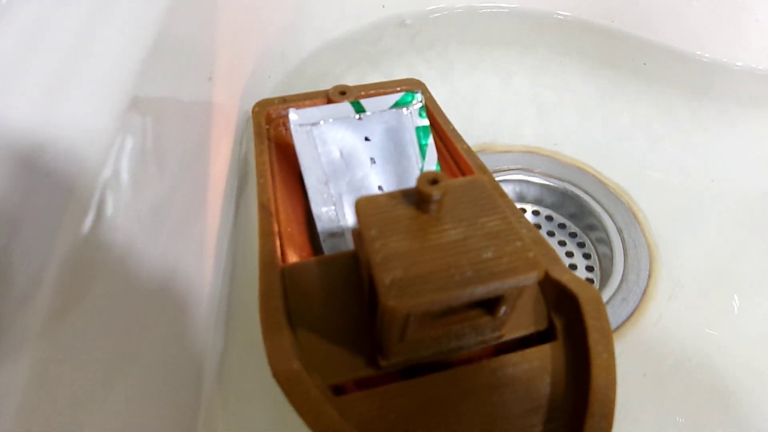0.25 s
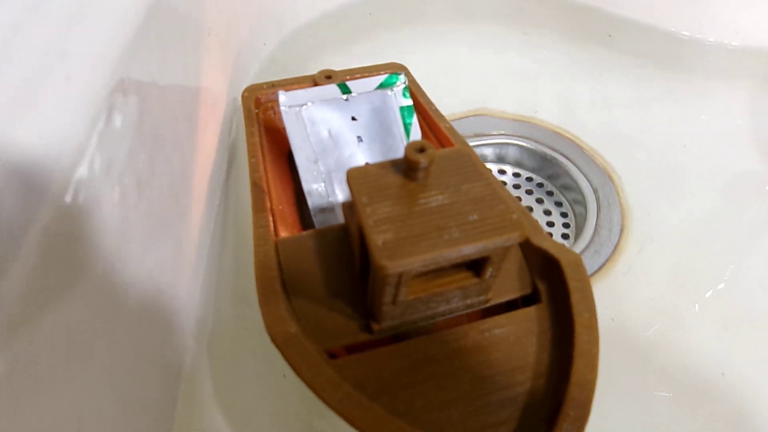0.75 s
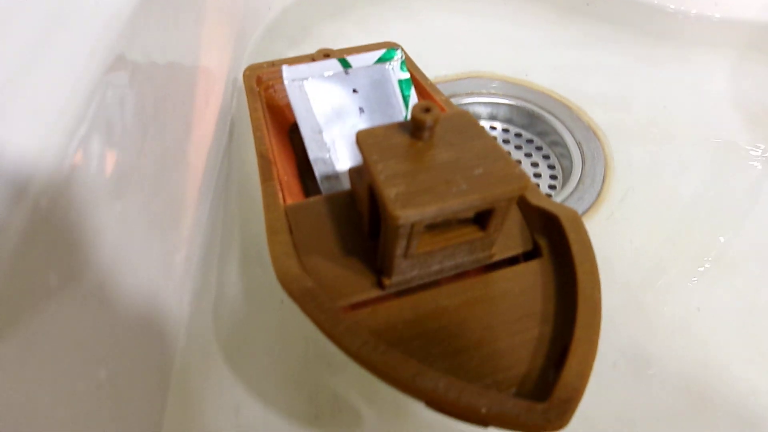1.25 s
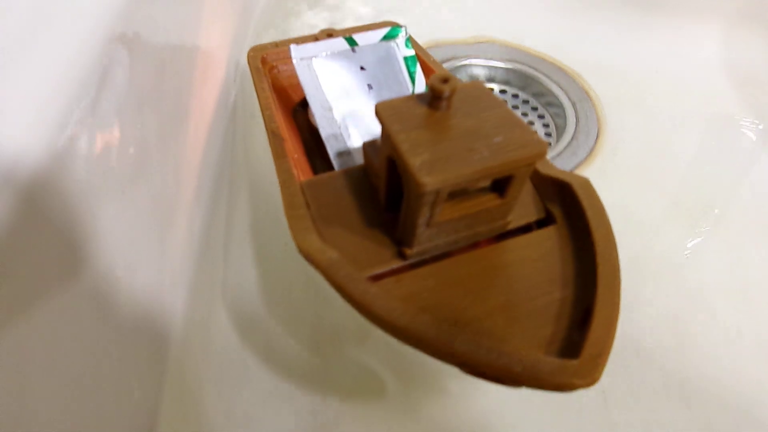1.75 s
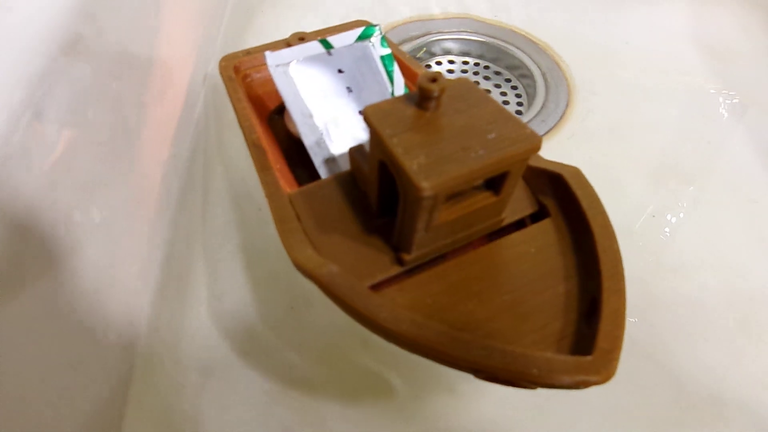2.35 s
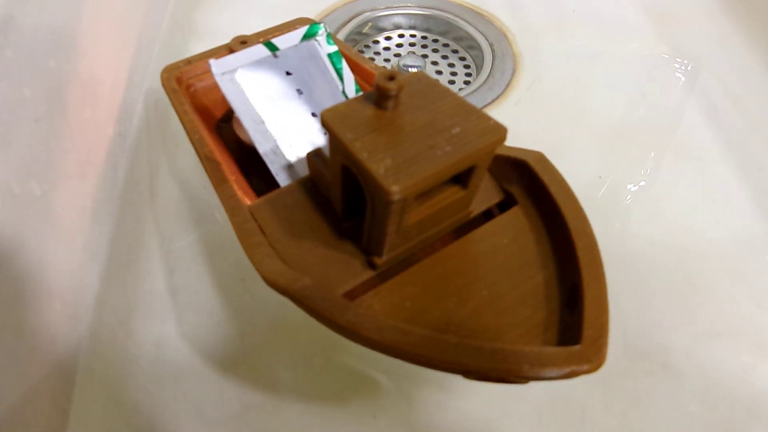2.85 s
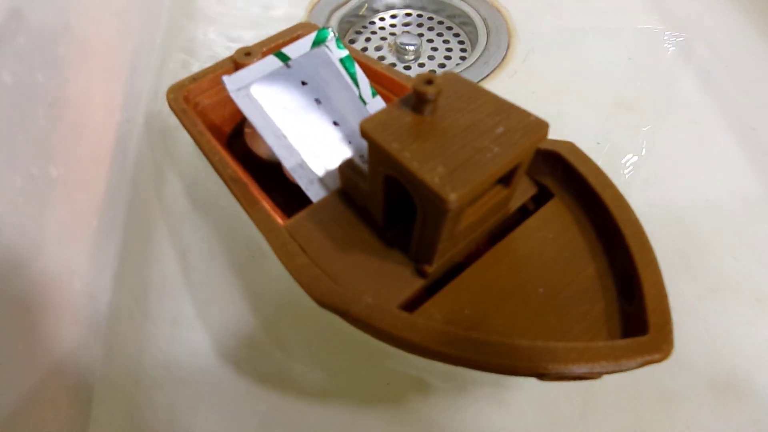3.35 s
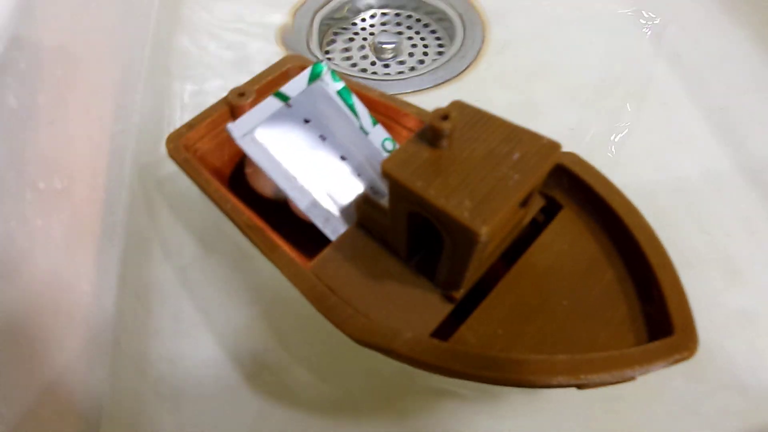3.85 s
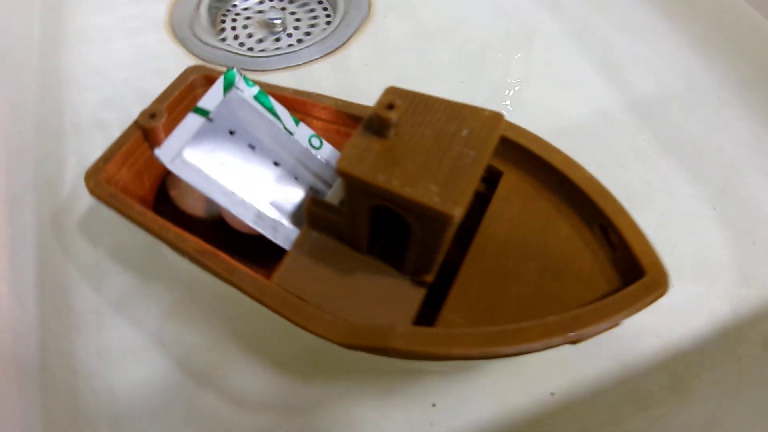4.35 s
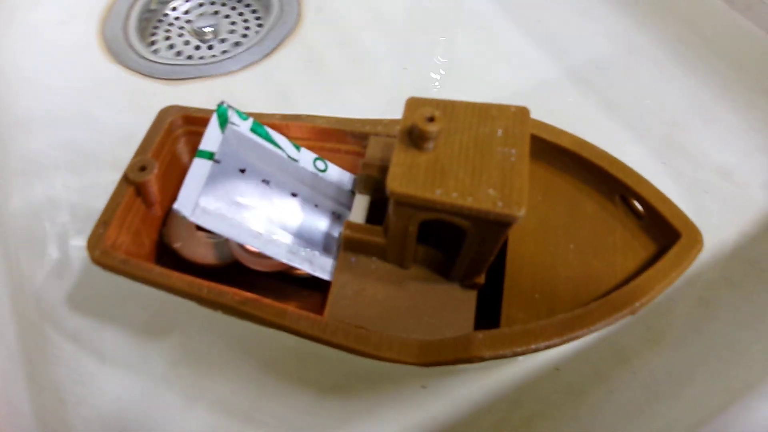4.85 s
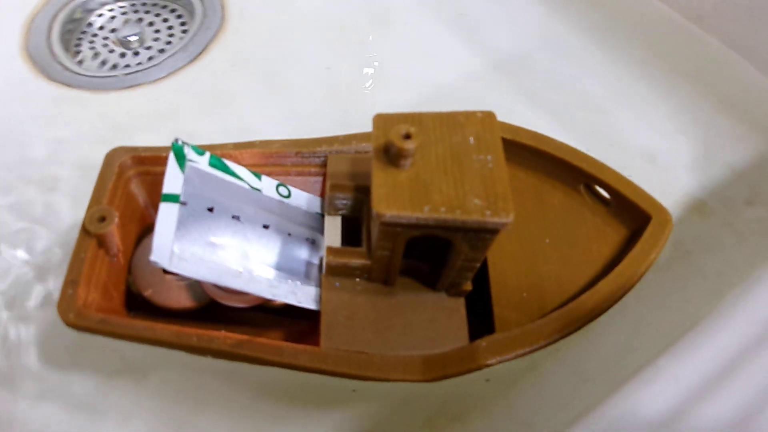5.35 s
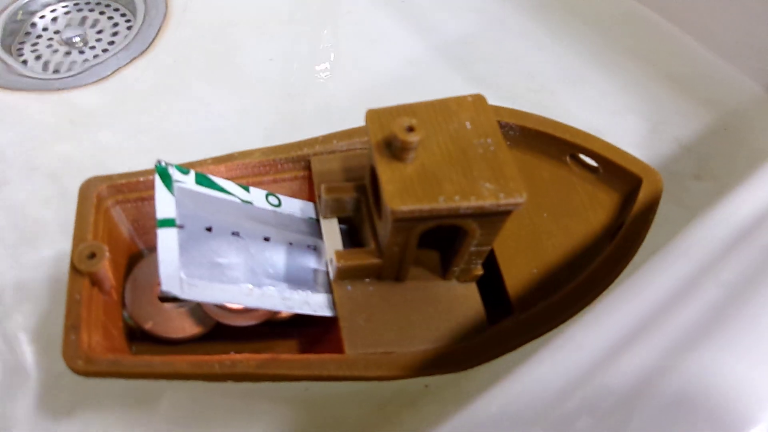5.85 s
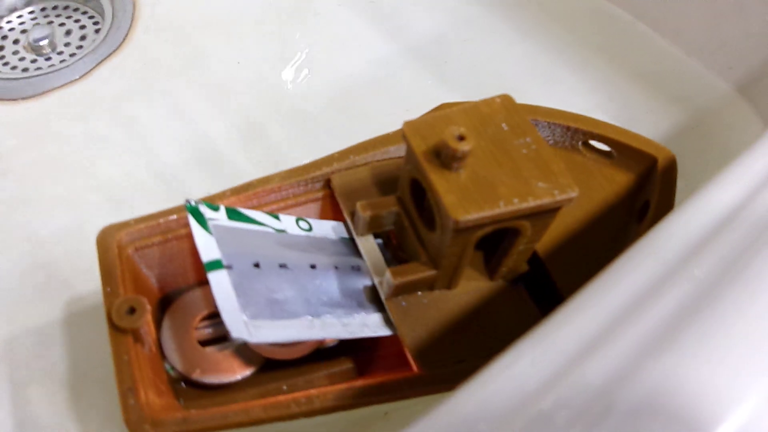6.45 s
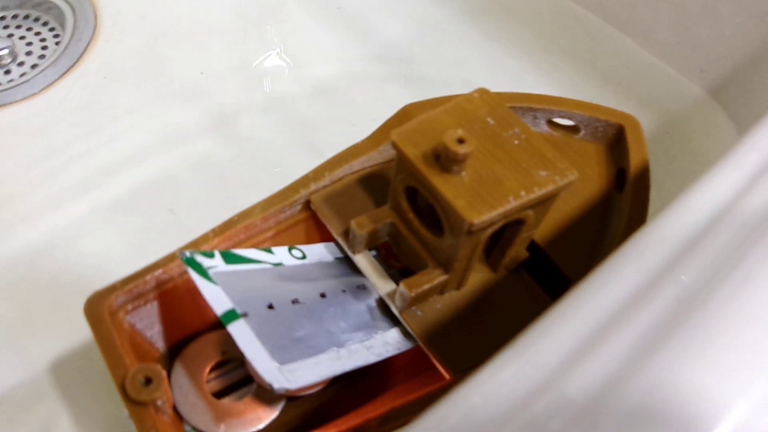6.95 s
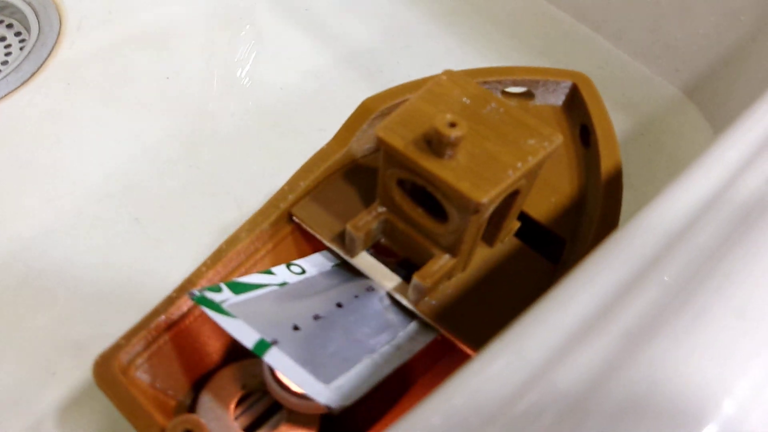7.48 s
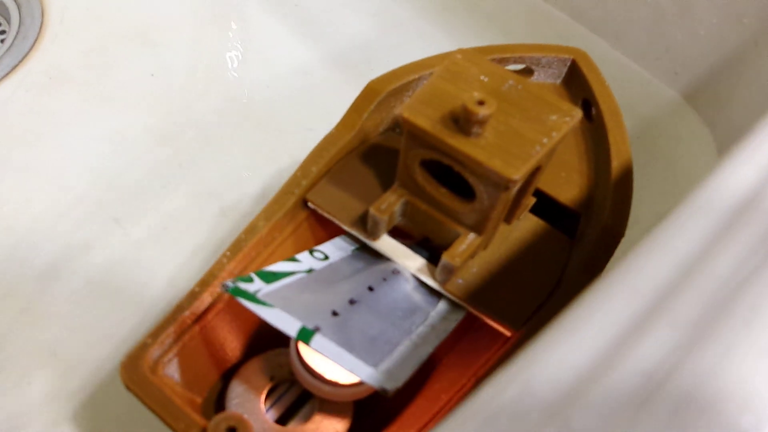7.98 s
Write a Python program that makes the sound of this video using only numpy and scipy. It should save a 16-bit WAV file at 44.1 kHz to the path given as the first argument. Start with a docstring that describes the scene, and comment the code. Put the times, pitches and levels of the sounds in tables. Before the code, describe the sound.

A small candle-heated toy boat putters in a sink. About nine times a second its thin boiler lid pops out with a round hollow knock and snaps back brighter about a twentieth of a second later. The clatter builds and collapses in four surges, with crinkly metal clicks on the hard strokes and faint exhaust fizz. Close microphone, small quiet room with short reflections.

```python
"""Pop-pop boat in a sink

A candle-heated toy boat circles in a basin, making about nine strokes a second in four surges.
Steam snaps the thin boiler lid out, then it snaps back as the steam condenses; both ring lid, hull and cabin.
Hard strokes mostly add crinkles; the exhaust fizzes and spits; one dry tick and some soft scuffs are heard too.
Rings are decaying sine waves and rough sounds are shaped noise; basin and small room add their echoes."""
import sys
import numpy as np
from scipy import signal
from scipy.fft import rfft, irfft, next_fast_len
from scipy.io import wavfile

SR = 44100
rng = np.random.default_rng(int(sys.argv[2]) if len(sys.argv) > 2 else 0)


def pcm_store(signal):
    """Save signal as 16-bit PCM."""
    levels = np.round(np.clip(np.atleast_2d(signal), -1, 1) * 32767)
    wavfile.write(sys.argv[1], SR, levels.astype(np.int16).T)


N = 362502  # length in samples
RING_T = np.arange(SR // 12) / SR  # time axis of one short sound, s

# Levels of rings and colours are relative: the whole sound is scaled afterwards.
# still room: colour of its noise [f/Hz, level/dB]
ROOM_TONE_COLOUR = [(20, -0.5), (30, 0), (45, -9), (90, -10.5), (200, -18.5), (380, -16), (700, -20),
                    (1500, -20.5), (3000, -33.5), (6000, -35.5), (9500, -35), (16000, -39.5)]
ROOM_TONE_DB = -61
# faint hum [f/Hz, level/dB]
HUM_TONES = [(152, -79), (263, -78)]
FIRST_STROKE_S = 0.02
# pace of the boiler: it quickens as steam builds and drops when a surge collapses [t/s, strokes per s]
STROKE_RATE = [(0.02, 8.755), (0.25, 8.483), (1.05, 9.096), (1.16, 8.956), (1.49, 9.533), (1.93, 8.301),
               (2.05, 8.627), (2.28, 8.201), (2.41, 8.984), (3.4, 9.127), (3.97, 8.338), (4.32, 9.005),
               (4.54, 8.857), (5.1, 9.358), (5.52, 9.169), (5.75, 7.89), (6.37, 8.335), (6.49, 9.006),
               (7.27, 9.102), (7.37, 9.244), (7.59, 9.098), (8.13, 9.787)]
# force of the strokes: four surges, each a slow build and a quicker collapse [t/s, level/dB]
STROKE_FORCE = [(0.02, -36.5), (0.25, -39), (0.49, -38), (1.59, -30.5), (1.81, -39.5), (1.95, -40.5),
                (2.52, -33.5), (3.33, -31), (3.95, -39), (4.2, -38), (5.12, -30.5), (5.52, -36),
                (5.63, -42.5), (5.9, -44.5), (6.25, -40.7), (7.37, -34.5), (8.02, -36), (8.13, -42)]
# how long the lid stays out before the steam condenses [t/s, dwell/s]
LID_DWELL = [(0.02, 0.046), (1.49, 0.045), (1.81, 0.0508), (2.41, 0.041), (3.07, 0.047), (3.4, 0.041),
             (3.51, 0.047), (3.85, 0.05), (4.32, 0.042), (4.54, 0.0465), (5.2, 0.0437), (5.75, 0.054),
             (6.49, 0.0349), (7.59, 0.047), (7.92, 0.045), (8.13, 0.051)]
# strength of the snap back in [t/s, level/dB compared with the snap out]
RETURN_LEVEL = [(0, -2.5), (1.6, -2.5), (2.0, -1), (2.5, -2.5), (3.4, -2.7), (4.5, -5.5), (5.7, -6.3),
                (7.55, -4), (7.9, -1), (8.13, -6.5)]
# sharpness of the snap out [t/s, level of the sharp part/dB]
SHARP_OUT = [(0, -18), (1.0, -17), (2.2, -24.5), (3.1, -22), (3.7, -24), (4.05, -17.5), (4.8, -23.5),
             (5.7, -24), (6.2, -20.5), (8.1, -18.5)]
# sharpness of the snap back in [t/s, level of the sharp part/dB]
SHARP_IN = [(0, -11), (1.5, -8), (1.85, -19), (2.3, -16.5), (3.35, -9), (3.7, -13.5), (5.25, -10.5),
            (5.75, -17.5), (6.2, -8), (8.1, -9.5)]
# low modes of lid, hull and cabin; each snap shifts them a little and may shorten the decay
# [f/Hz, 60 dB decay/s, level snapping out/dB, level snapping in/dB]
BODY_MODES = [(399.2, 0.053, -20, -17), (576, 0.028, -18.5, -23), (687, 0.029, -2.5, -16.5),
              (797.4, 0.018, -10.5, -8), (884.6, 0.099, -32, -27), (1065, 0.042, -47, -13),
              (1217, 0.015, -14.5, -6.5), (1298.8, 0.028, -1, -3), (1637, 0.017, -11.5, -9),
              (1775, 0.015, -9, -7.5), (1940, 0.022, -15.5, -11.5), (2038, 0.024, -32, -28)]
# two modes whose pitch wanders, first of the hull, then of the lid
# [60 dB decay/s, level snapping out/dB, level snapping in/dB]
WANDERING_MODES = [(0.028, -12.5, -5.5), (0.015, -9.5, -4)]
# pitch of the wandering hull mode [t/s, f/Hz]
HULL_PITCH = [(0, 855), (0.7, 872), (1.4, 900), (2.0, 865), (2.8, 890), (4.35, 855), (4.8, 925), (6.5, 916),
              (8.2, 937)]
# pitch of the wandering lid mode [t/s, f/Hz]
LID_PITCH = [(0, 1625), (0.4, 1630), (0.8, 1735), (1.3, 1690), (3.9, 1615), (4.4, 1815), (5.4, 1780),
             (6.6, 1650), (7.3, 1760)]
# high modes of the lid, woken by a sharp snap [f/Hz, 60 dB decay/s, level/dB]
LID_MODES = [(2264, 0.021, 5.5), (2410, 0.075, -5), (2936, 0.036, -0.5), (3222, 0.032, 3), (3464, 0.016, 4),
             (3573, 0.038, -4), (4050, 0.062, -28), (4420, 0.029, -2.5), (5596, 0.021, -5.5),
             (5970, 0.025, -17)]
# colour of the crack in a sharp snap [f/Hz, level/dB]
CRACK_COLOUR = [(1500, -12.5), (2300, 7.5), (2900, 0.5), (3600, 0), (4200, -7.5), (5500, -7.5),
                (7000, -17.5), (9000, -12.5), (11000, -20), (16000, -48)]
# centres of the low ring, the hull, the cabin, the lid, and its bright ring with the gaps beside it [f/Hz]
REGION_HZ = [680, 900, 1300, 1700, 2700, 3600, 4500]
# the low ring saturates: above a gentle stroke it loses LOW_RING_LAG dB for each dB of force
LOW_RING_DB, GENTLE_STROKE_DB, LOW_RING_LAG = 2.5, -38, 1.1
# level of the hull's ring near 900 Hz as the boat turns [t/s, level/dB]
HULL_LEVEL = [(0, -4), (0.9, 11), (2.5, 10), (4.0, 2), (5.2, -0.5), (5.65, -7.5), (6.4, 5.5), (7.4, 10),
              (8.2, 7)]
# level of the lid's ring near 1700 Hz [t/s, level/dB]
LID_LEVEL = [(0, 3.5), (0.7, 3.5), (1.8, -1.5), (2.4, 4.5), (4.4, -2), (5.75, -12), (6.45, 1.5), (7.5, 5.5),
             (8.2, 2)]
# level of the bright ring near 3600 Hz, which stands out in the first surge [t/s, level/dB]
BRIGHT_LEVEL = [(0, 8), (0.8, -8), (1.55, 24), (2.1, -7), (3.5, 7), (5.0, -8), (6.1, 3), (8.2, -5)]
# gaps between rings, where hull and water surface cancel each other [f/Hz, width/Hz, depth/dB]
NOTCHES = [(1012, 132, -4.5), (1460, 69, -5.5), (2870, 240, -3.5)]
# mostly on hard strokes, a dent in the lid gives way between the snaps
# [t/s, level/dB, level of the sharp part/dB, strongest ring f/Hz]
CRINKLES = [(0.0435, -47, -22, 3180), (1.192, -37, -13, 1680), (1.2662, -42.5, -15, 1720),
            (1.4186, -35, -3.5, 1870), (1.523, -33.5, -14.5, 1850), (1.623, -35, -25, 1680),
            (1.6317, -33, -5, 1990), (1.7365, -45.5, -2, 1330), (2.6691, -50, -13, 1420),
            (2.9924, -32.5, -9, 1630), (3.066, -43, -12, 1520), (3.2205, -29, -32, 1830),
            (3.3321, -38, -13, 2100), (3.4329, -29.5, -17, 1840), (3.5524, -45, -3.5, 1800),
            (4.15, -48.5, -8, 2290), (5.1268, -38, -24, 1270), (5.2353, -35, -28, 1470),
            (5.2404, -34.5, -14, 1840), (5.3397, -36, -10.5, 1270), (5.448, -38.5, -17, 1440),
            (5.4541, -35.5, -6, 1550), (5.546, -43.5, -7, 1730), (5.5603, -41, -6.5, 1500),
            (6.5995, -43.5, -17, 2900), (7.299, -39, -20, 1510), (7.4012, -34.5, -10.5, 1720),
            (7.632, -41, -21, 1570), (7.723, -35, -12.5, 1090), (7.728, -32.5, -15, 1690),
            (7.7394, -38.5, -2, 1380), (7.8393, -36, -13, 1670), (7.9468, -34, -9.5, 1700),
            (8.054, -30.5, -7.5, 2100)]
# tiny spits of water; the level is before the 18 dB cut in spits() [t/s, level/dB, strongest f/Hz]
WATER_SPITS = [(1.0937, -39, 8370), (1.5334, -36, 8200), (3.1207, -36, 9100), (3.5535, -35, 8400),
               (5.247, -34.5, 9250), (7.2, -36.5, 8800), (7.9618, -39, 10600), (8.0578, -30.5, 9300)]
# one dry tick with a soft thump
TICK_S, TICK_DB, THUMP_DB = 3.3017, -38.5, -49
# colour of the dry tick [f/Hz, level/dB]
TICK_COLOUR = [(40, -3), (250, -1), (700, -2), (2000, -2), (3600, 4.5), (5000, -3), (6200, -13), (9000, 0),
               (12500, -4), (16000, -15)]
# two parts of a soft scuff and its low bump; level is before the swell
# [t/s, length/s, level/dB, centre f/Hz, fall below the centre/dB per octave, steeper far above it]
SCUFFS = [(4.075, 0.079, -61.5, 5500, -0.5), (4.08, 0.19, -60, 2670, 21), (3.5, 0.053, -69, 220, 11)]


def undb(db):
    """Turn decibels into a gain."""
    return 10 ** (np.asarray(db) / 20)


def unit(x):
    """Scale a sound to an energy of one."""
    return x / np.sqrt(np.sum(x ** 2, axis=-1, keepdims=True))


def burst(x, db):
    """Give a short sound the energy of 10 ms at the given level."""
    return unit(x) * undb(db) * np.sqrt(SR / 100)


def fade(t, rise_s, t60, hold=1):
    """A quick swell and a decay; hold above 1 keeps the sound up a moment, then drops it faster."""
    swell = 1 - np.exp(-t / rise_s)
    decay = np.exp(-np.log(1000) * (t / t60) ** hold)
    return swell * decay


def at(curve, s):
    """Read a curve at a time, with straight lines between its points."""
    return np.interp(s, *np.transpose(curve))


def noise(colour, size):
    """Noise of rms one, coloured by (Hz, dB) points."""
    hz, db = np.transpose(colour)
    bins = np.maximum(np.fft.rfftfreq(size, 1 / SR), 1)
    gain = undb(np.interp(np.log(bins), np.log(hz), db))
    x = irfft(rfft(rng.standard_normal(size)) * gain, size)
    return x / np.std(x)


def hump(hz, slope_db):
    """A colour set by its slope on both sides of a centre, falling faster far above it."""
    return [(hz / 8, -3 * slope_db), (hz, 0), (1.5 * hz, -.6 * slope_db),
            (2.3 * hz, -1.2 * slope_db - 14), (8 * hz, -90)]


def add(track, s, x):
    """Mix a sound into the track at a time."""
    i = max(int(s * SR), 0)
    track[i:i + len(x)] += x[:max(N - i, 0)]


def ring(hz, t60, db, rise_s, hold):
    """Decaying sine waves struck together, each taking a moment to build up."""
    waves = np.sin(2 * np.pi * hz[:, None] * RING_T)
    waves = waves * fade(RING_T, rise_s, t60[:, None], hold)
    return undb(db) @ unit(waves)


def room_tone():
    """Low rumble and soft hiss from shaped noise, with hum tones whose phase drifts at random."""
    out = undb(ROOM_TONE_DB) * noise(ROOM_TONE_COLOUR, size=next_fast_len(N))[:N]
    for hz, db in HUM_TONES:
        wander = np.cumsum(rng.standard_normal(N)) * 0.021
        tone = np.sin(2 * np.pi * hz * np.arange(N) / SR + wander)
        out = out + undb(db) * np.sqrt(2) * tone
    return out


def strokes():
    """The times at which steam pushes the lid out, each one period after the last."""
    times = [FIRST_STROKE_S]
    while times[-1] < N / SR:
        times.append(times[-1] + 1 / at(STROKE_RATE, times[-1]))
    return np.array(times[:-1])


def colour_db(hz, s):
    """The balance of the rings, set by the force of the stroke and the way the boat faces."""
    excess_db = max(at(STROKE_FORCE, s) - GENTLE_STROKE_DB, 0)
    low_db = LOW_RING_DB - LOW_RING_LAG * excess_db
    levels = [low_db, at(HULL_LEVEL, s), 0, at(LID_LEVEL, s), 0, at(BRIGHT_LEVEL, s), 0]
    return np.interp(hz, REGION_HZ, levels)


def edge(s, lid_db, crack_db, crack_rise_s, crack_t60):
    """The sharp part of a snap: the lid's high modes ring and a short noise cracks."""
    hz, t60, db = np.transpose(LID_MODES)
    pitch_luck, level_luck = rng.standard_normal((2, len(hz)))
    mode_db = db + colour_db(hz, s) + 3 * level_luck
    lid = ring(hz * (1 + 0.013 * pitch_luck), t60, mode_db, rise_s=0.00052, hold=1.38)
    crack = noise(CRACK_COLOUR, size=len(RING_T)) * fade(RING_T, crack_rise_s, crack_t60)
    return burst(lid, lid_db) + burst(crack, crack_db)


def pops(events, axis, rise_s, hold, damping, scatter_db, detune, gain_db, **sharp):
    """Each snap of the whole lid rings the low modes; axis 0 is outward and 1 is inward."""
    out = np.zeros(N)
    steady_hz, *steady = np.transpose(BODY_MODES)
    t60, *strengths = np.hstack([steady, np.transpose(WANDERING_MODES)])
    for s, db, sharp_db in events:
        hz = np.r_[steady_hz, at(HULL_PITCH, s), at(LID_PITCH, s)]
        # no two strokes are quite alike
        pitch_luck, level_luck = rng.standard_normal((2, len(hz)))
        mode_hz = hz * (1 + detune * pitch_luck)
        mode_db = strengths[axis] + colour_db(hz, s) + scatter_db * level_luck
        body = ring(mode_hz, t60 / damping, mode_db, rise_s, hold)
        snap = burst(body, gain_db) + undb(sharp_db) * edge(s, **sharp)
        add(out, s, undb(db) * snap)
    return out


def lid_snaps():
    """Steam pops the lid out with a round sound; after the dwell it condenses and the lid pops back brighter."""
    s = strokes()
    db = at(STROKE_FORCE, s)
    snaps_out = zip(s, db, at(SHARP_OUT, s))
    snaps_in = zip(s + at(LID_DWELL, s), db + at(RETURN_LEVEL, s), at(SHARP_IN, s))
    outward = pops(snaps_out, axis=0, rise_s=0.00056, hold=2.17, damping=1.42, scatter_db=1.13,
                   detune=0.0082, gain_db=-1.9,
                   lid_db=-8.5, crack_db=-4, crack_rise_s=0.00085, crack_t60=0.044)
    inward = pops(snaps_in, axis=1, rise_s=0.00054, hold=1.41, damping=1.0, scatter_db=1.6,
                  detune=0.011, gain_db=-1.16,
                  lid_db=-7, crack_db=-5, crack_rise_s=.0012, crack_t60=0.033)
    return outward + inward


def basin(x, db, t60, count):
    """Close reflections off the sink walls; their pattern slowly changes as the boat moves."""
    out, place = np.zeros(N), np.linspace(0, count - 1, N)
    for k in range(count):
        # the reflections start 2 ms after the direct sound
        shape = fade(np.maximum(RING_T - .002, 0), 0.0074, t60)
        walls = rng.standard_normal(len(RING_T)) * shape
        # each pattern blends smoothly into the next
        near = np.flatnonzero(np.abs(place - k) < 1)
        share = np.cos(np.pi / 2 * (place[near] - k))
        add(out, near[0] / SR, signal.fftconvolve(x[near] * share, unit(walls)))
    return undb(db) * out


def notched(x):
    """Carve the narrow gaps that keep the rings apart and make the pop hollow."""
    for hz, width_hz, depth_db in NOTCHES:
        band = signal.lfilter(*signal.iirpeak(hz, hz / width_hz, fs=SR), x)
        x = x - (1 - undb(depth_db)) * band
    return x


def room(x, db, t60, treble_db, treble_t60):
    """The small room's tail: fading noise in which a low and a treble part decay separately."""
    t = np.arange(SR // 2) / SR
    low_colour = [(100, -0.5), (500, -7.0), (2200, -10), (5000, -8.5), (16000, -45)]
    low = noise(low_colour, size=len(t)) * fade(t, 0.0062, t60)
    high_colour = [(1500, -14), (4000, -4.0), (16000, 5)]
    high = noise(high_colour, size=len(t)) * fade(t, 0.012, treble_t60)
    tail = undb(db) * unit(low) + undb(treble_db) * unit(high)
    return signal.fftconvolve(x, tail)[:N]


def exhaust_fizz():
    """A faint burst of bright noise follows each push of steam, with varied delay and level."""
    out = np.zeros(N)
    t = np.arange(SR // 25) / SR
    colour = [(2000, 11), (4000, 7.5), (6000, 4.5), (9000, 10.0), (11000, 3.5), (15000, -27)]
    for s in strokes():
        late, size = rng.standard_normal(2)
        fizz = noise(colour, size=len(t)) * fade(t, 0.0073, 0.071)
        add(out, s + .014 + .004 * late, burst(fizz, at(STROKE_FORCE, s) - 30.5 + 4 * size))
    return out


def crinkles(slope_db, t60, rough_db):
    """A dent gives way in a rough little run of slips around its own pitch, and shakes the nearby modes."""
    out = np.zeros(N)
    hz, mode_t60 = np.transpose(BODY_MODES)[:2]
    for s, db, sharp_db, dent_hz in CRINKLES:
        # each dent strikes the modes a little differently
        pitch_luck, level_luck = rng.standard_normal((2, len(hz)))
        octaves_away = np.abs(np.log2(hz / dent_hz))
        mode_db = 2.5 * level_luck - slope_db * octaves_away
        modes = ring(hz * (1 + .03 * pitch_luck), mode_t60, mode_db, rise_s=0.00043, hold=1.93)
        # one patch of noise stands for the run of slips
        slips = noise(hump(dent_hz, slope_db), size=len(RING_T)) * fade(RING_T, 0.00035, t60)
        sharp = edge(s, lid_db=-7, crack_db=-5.0, crack_rise_s=0.00027, crack_t60=0.018)
        crinkle = burst(modes, db=-5) + burst(slips, rough_db) + undb(sharp_db) * sharp
        add(out, s, undb(db) * crinkle)
    return out


def spits():
    """Now and then the exhaust spits a droplet: a very short noise around one high pitch."""
    out = np.zeros(N)
    t = np.arange(SR // 25) / SR
    for s, db, hz in WATER_SPITS:
        colour = [(0.26 * hz, -14), (.75 * hz, -10), (hz, 0), (1.16 * hz, -12), (1.5 * hz, -26)]
        drop = noise(colour, size=len(t)) * fade(t, rise_s=0.00074, t60=0.0094)
        add(out, s, burst(drop, db - 18.0))
    return out


def dry_tick():
    """One tick of noise that dies in milliseconds, over a soft thump of low noise."""
    out = np.zeros(N)
    tick = noise(TICK_COLOUR, size=len(RING_T)) * fade(RING_T, rise_s=.0001, t60=0.0035)
    add(out, TICK_S, burst(tick, TICK_DB))
    thump_colour = [(30, 8), (80, -9), (250, -6), (600, -25), (2000, -50)]
    thump = noise(thump_colour, size=len(RING_T)) * fade(RING_T, rise_s=.0005, t60=0.025)
    add(out, TICK_S, burst(thump, THUMP_DB))
    return out


def scuffs():
    """A soft two-part scuff and a low bump: noise that swells and sinks."""
    out = np.zeros(N)
    for s, length, db, hz, slope_db in SCUFFS:
        swell = np.sin(np.pi * np.linspace(0, 1, int(length * SR)) ** 0.68)
        add(out, s, undb(db) * noise(hump(hz, slope_db), size=len(swell)) * swell)
    return out


def scene():
    """The boat in the basin, in the room."""
    boiler = lid_snaps() + crinkles(slope_db=15.5, t60=.02, rough_db=-10.0)
    exhaust = exhaust_fizz() + spits()
    direct = boiler + exhaust + dry_tick() + scuffs()
    close = notched(direct + basin(direct, db=-13.5, t60=0.03, count=12))
    tail = room(close, db=-21.5, t60=0.24, treble_db=-24.0, treble_t60=.28)
    return (close + tail + room_tone())[None]


def record(dry):
    """The phone cuts the top: a steep low-pass filter at 15850 Hz."""
    low_pass = signal.ellip(10, .1, 70, 15850, fs=SR, output="sos")
    return signal.sosfilt(low_pass, dry)


dry = scene()
out = record(dry)
pcm_store(out)
```